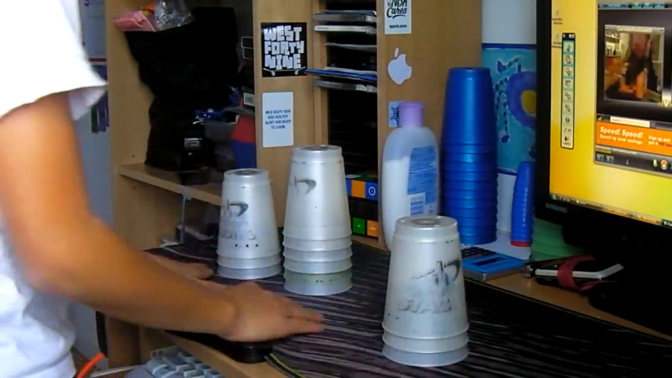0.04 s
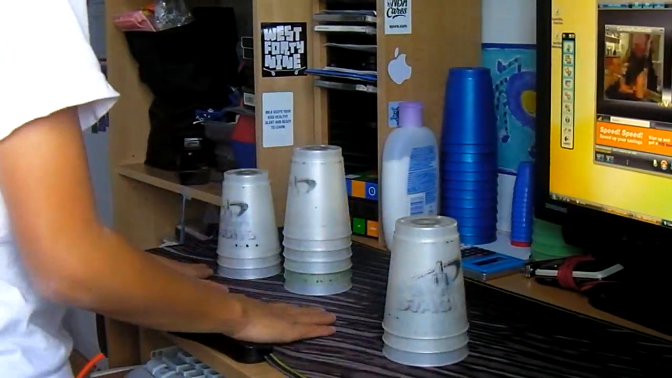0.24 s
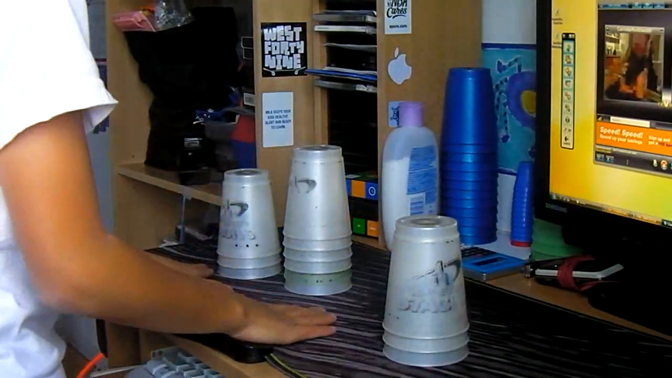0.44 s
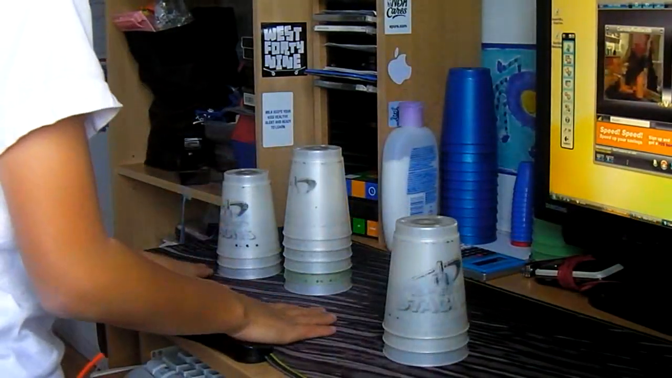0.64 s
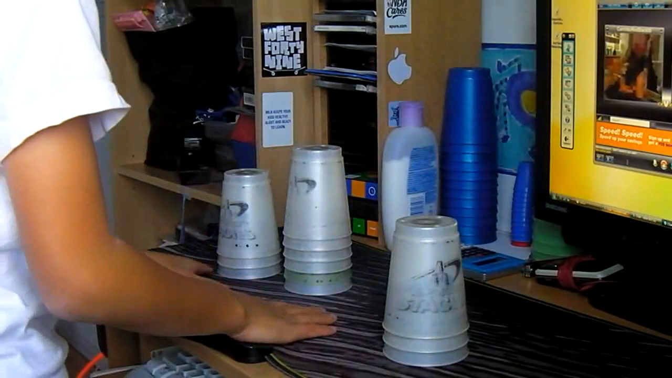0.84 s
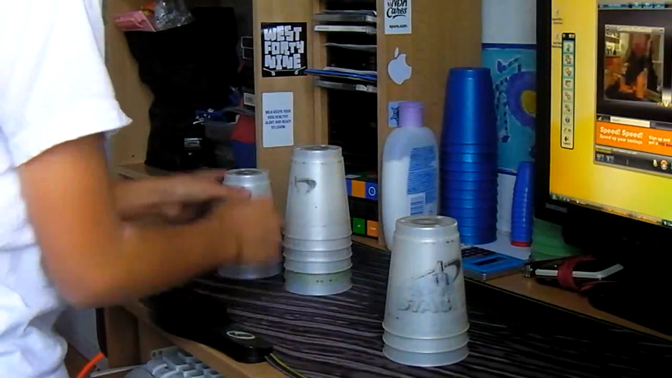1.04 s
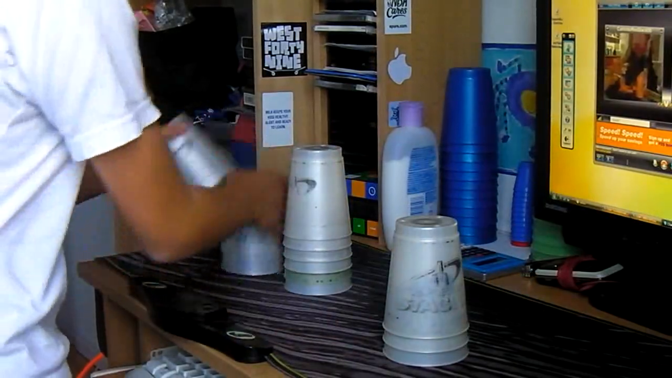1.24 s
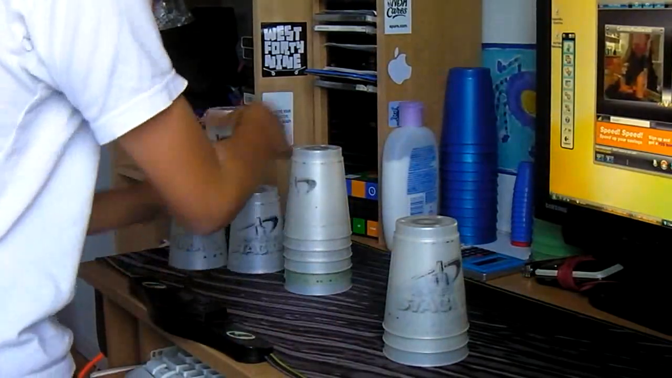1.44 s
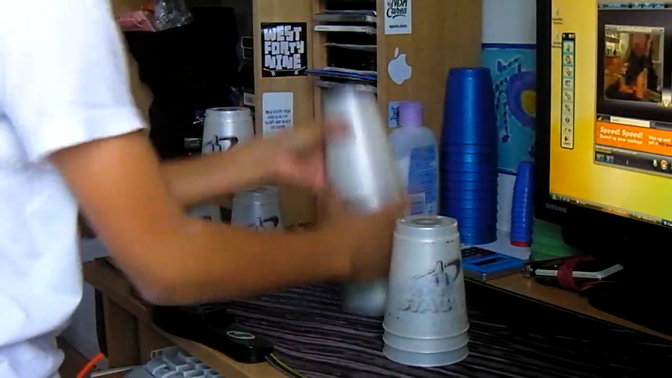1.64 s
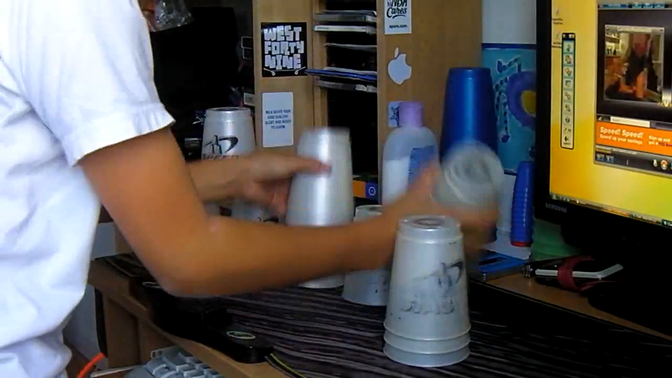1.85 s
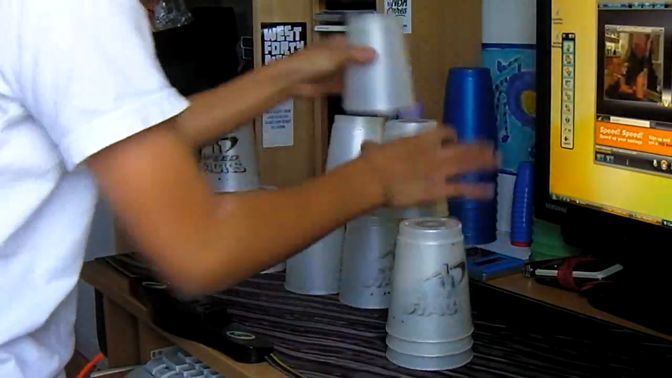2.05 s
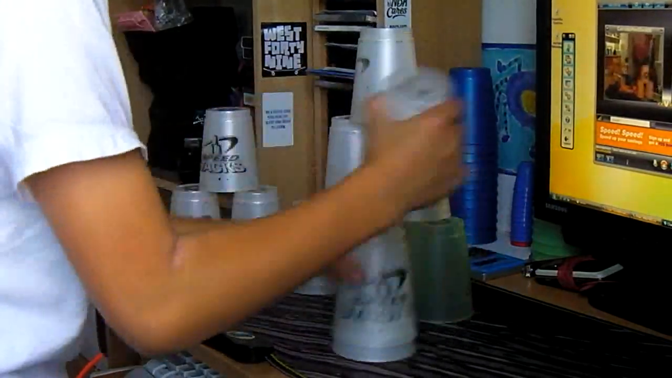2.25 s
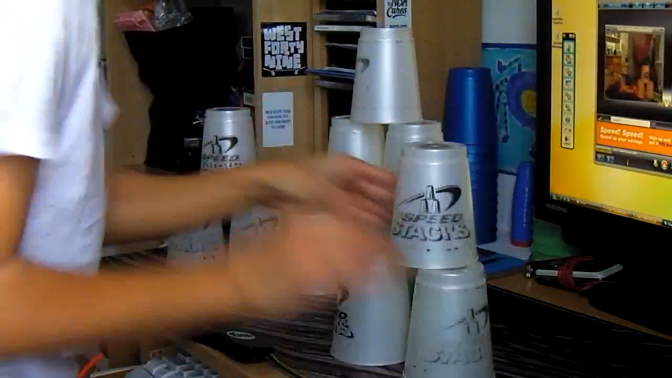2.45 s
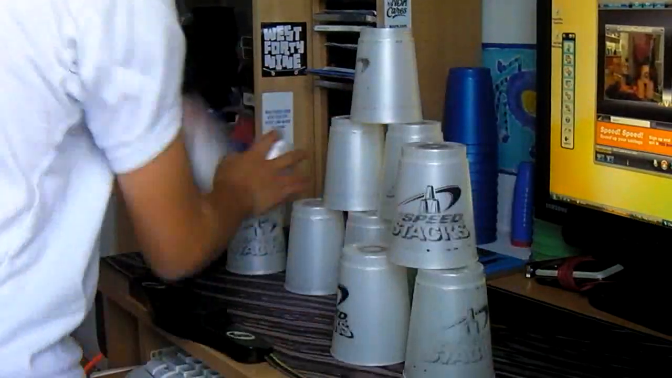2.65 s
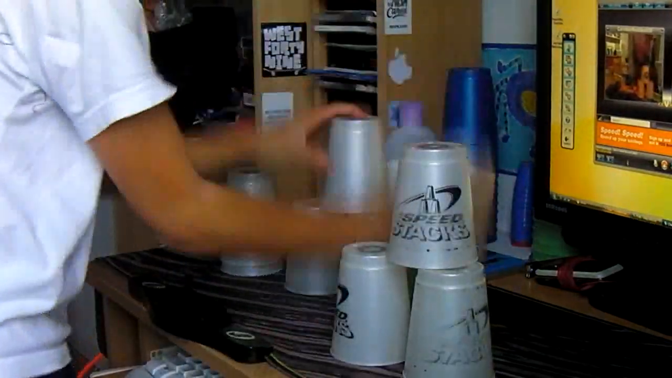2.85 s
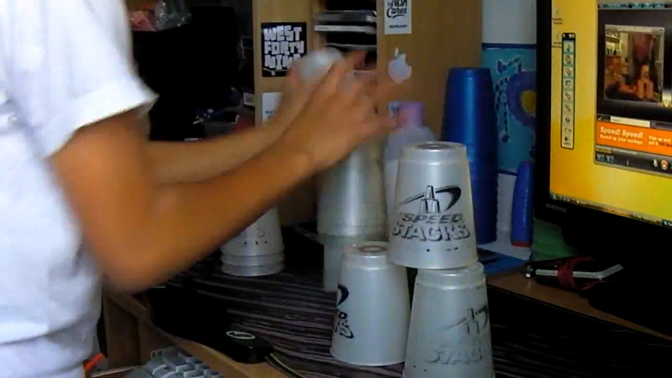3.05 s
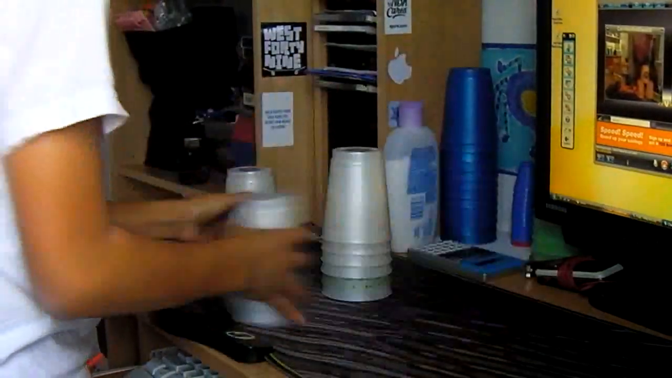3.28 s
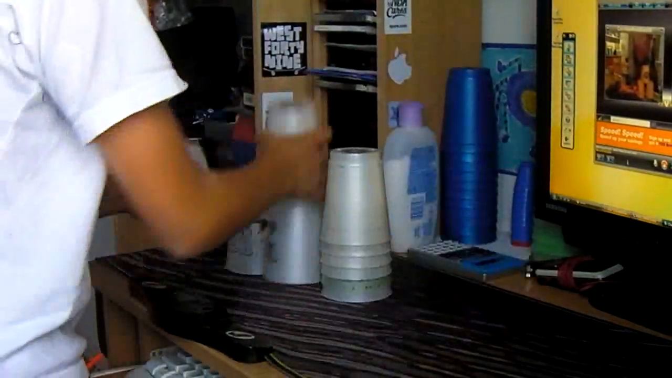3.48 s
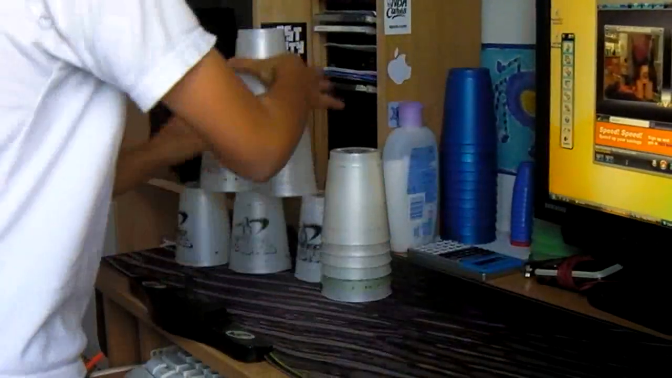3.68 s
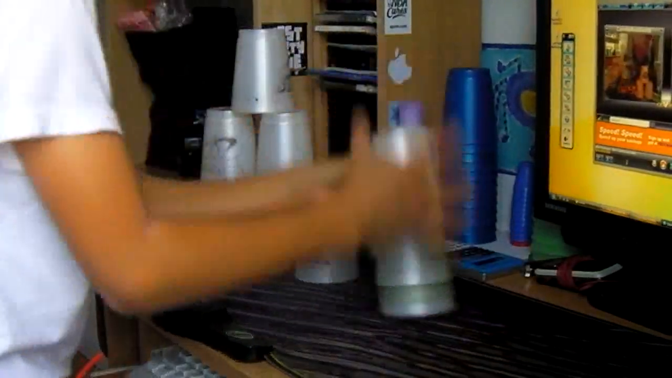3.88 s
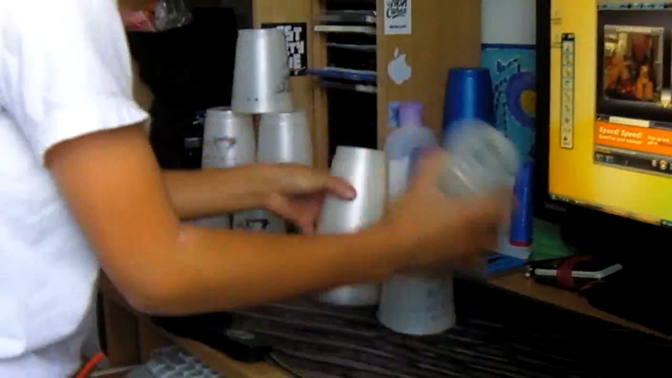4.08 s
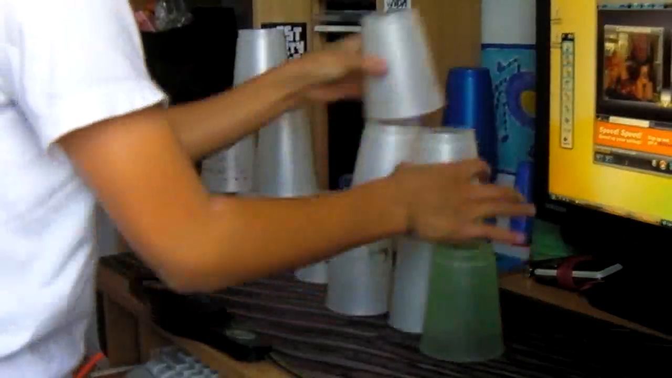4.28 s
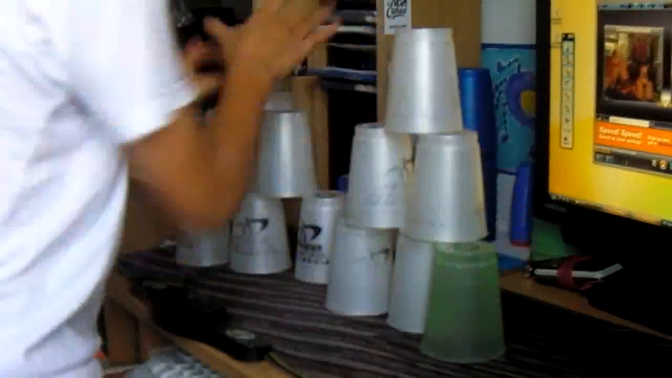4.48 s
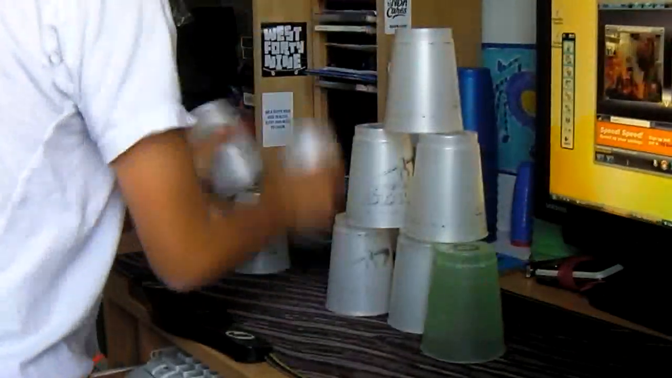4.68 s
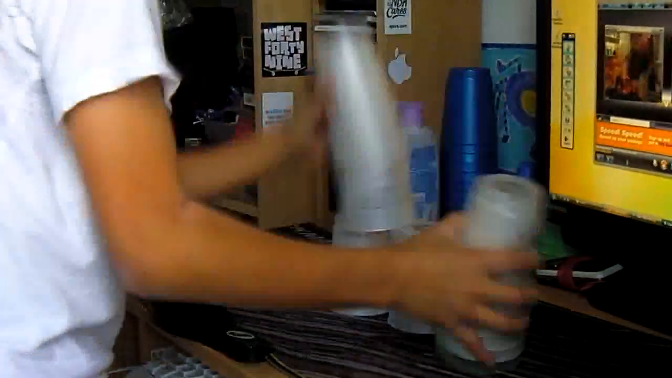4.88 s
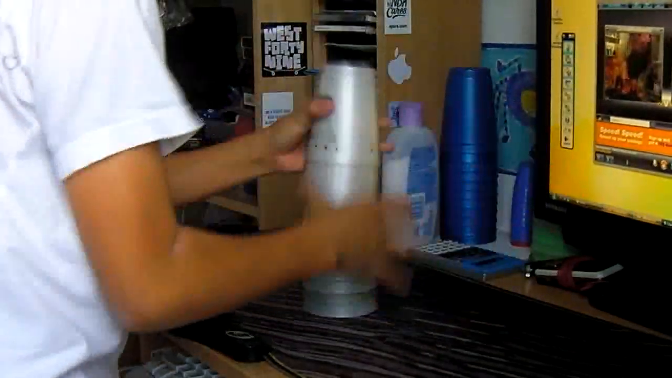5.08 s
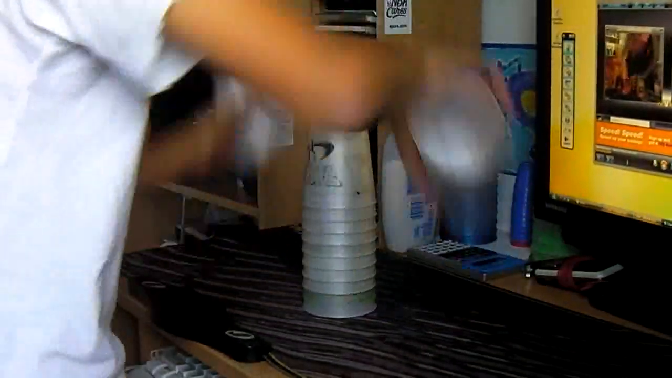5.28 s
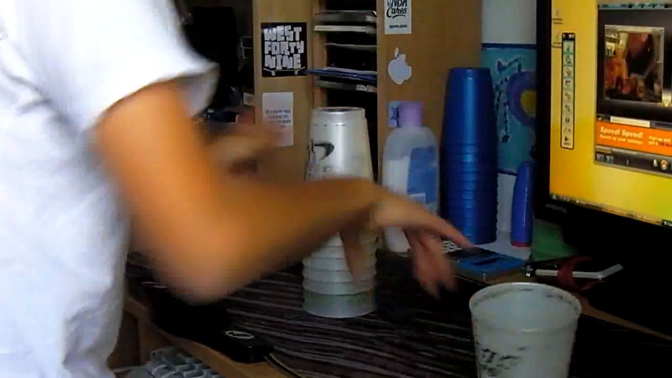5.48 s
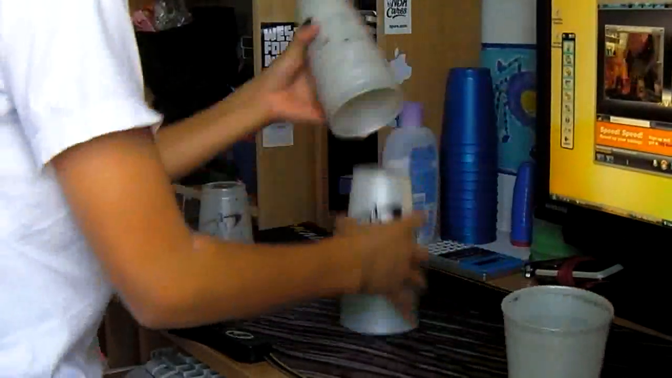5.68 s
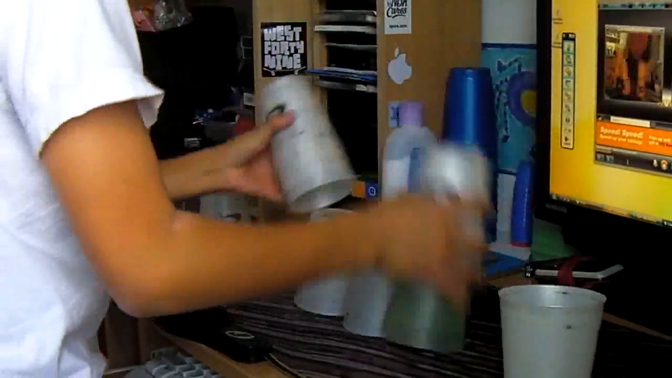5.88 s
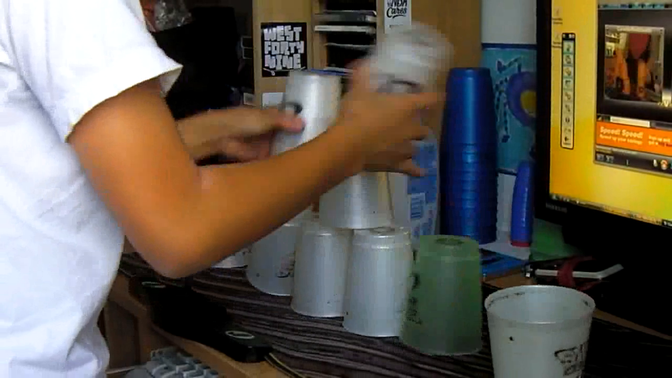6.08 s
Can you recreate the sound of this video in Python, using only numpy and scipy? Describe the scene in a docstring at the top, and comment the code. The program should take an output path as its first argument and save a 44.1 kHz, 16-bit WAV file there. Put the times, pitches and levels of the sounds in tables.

```python
"""A small room with a desk and a cloth mat: after a tap on the desk, plastic cups are stacked and unstacked at speed.
Each clack is a short chatter of rim contacts that rings the air in the cup, the cup wall and the desk top, with a crack.
Sliding cups and hands are flickering, ticking noise, coloured as a dry hiss and as a scrape through the cup body.
The air in a moving cup hums as noise through one gliding resonance.
Noise reflections make the room; two close microphone ports hear it over hiss, rumble and a faint hum that rise and sink."""
import sys
import numpy as np
from scipy import signal
from scipy.fft import rfft, irfft, next_fast_len
from scipy.io import wavfile
from scipy.ndimage import uniform_filter1d

SR = 44100
rng = np.random.default_rng(int(sys.argv[2]) if len(sys.argv) > 2 else 0)


def master(y):
    """Save y as 16-bit WAV."""
    cut = np.clip(np.atleast_2d(y).T, -1, 1)
    pcm = np.round(cut * 32767)  # scale
    wavfile.write(sys.argv[1], SR, pcm.astype(np.int16))


N = 270156  # length [samples]

# Quiet room and microphone hiss, relative spectrum: (frequency [Hz], density [dB per Hz])
AIR_COLOUR = [(18, -54), (30, -4), (88, -5.5), (103, -12), (124, -13), (145, -5.5), (189, -14), (259, -8.5),
              (486, -20), (540, -20), (988, -19), (11700, -27), (16000, -29)]
# Likeness of the hiss at the two ports: (frequency [Hz], correlation [-1 to 1, clipped])
AIR_LIKENESS = [(60, -0.69), (180, 0.057), (550, -1), (1650, -0.59), (4970, -0.46), (15000, -0.22)]
# Rise and fall of the hiss and hum together: (time [s], level change [dB])
AIR_DRIFT = [(0, 6), (1.5, 5), (1.75, 6), (2.75, 11), (3.6, -11), (4.7, -12), (5.5, 2), (6.13, -3)]
# Hum partials, before the port balance and the drift: (frequency [Hz], rms level [dB])
HUM_PARTIALS = [(118.4, -67), (231.5, -74)]
AIR_DB = -55  # rms of the hiss before the drift

# Slowly swelling and fading rubbing of cups and hands: (time [s], hiss level [dB], scrape level [dB])
SLOW_SLIDE = [(0.0, -32.5, -42), (0.43, -59, -61.5), (1.38, -60.5, -65), (1.82, -42.5, -42),
              (2.23, -39.5, -37.5), (2.73, -52.5, -42.5), (3.05, -25, -27.5), (3.27, -36, -33.5),
              (3.51, -55, -47), (4.04, -49.5, -46.5), (4.69, -47, -42.5), (5.03, -34.5, -35),
              (5.49, -61.5, -55.5), (6.12, -64, -55)]
# Single strokes, a hand brushing the mat or cups pulled out of or pushed into a stack:
# (start [s], length [s], peak hiss level [dB], peak scrape level [dB])
SLIDE_STROKES = [(0.122, 0.08, -39, -67), (0.254, .11, -50, -96), (1.07, 0.17, -57.5, -70),
                 (1.327, 0.15, -45, -45.5), (1.596, 0.13, -57, -33.5), (1.84, 0.062, -22.5, -24),
                 (2.037, 0.092, -33, -47), (2.422, 0.079, -31, -30), (2.562, 0.094, -23, -19.5),
                 (2.8, 0.22, -26.5, -29), (2.992, 0.15, -39, -31.5), (3.259, .14, -32, -27.5),
                 (3.37, 0.17, -32, -34.5), (3.654, 0.45, -50, -43.5), (4.108, 0.055, -29, -28),
                 (4.29, 0.18, -52, -39), (4.459, 0.14, -40, -27), (4.733, 0.17, -27, -22.5),
                 (4.93, .07, -33, -42), (5.017, 0.16, -26, -23), (5.126, 0.24, -36, -31),
                 (5.785, 0.11, -44.5, -43), (5.984, 0.19, -47, -44)]
# Dry hiss of the surfaces, relative spectrum: (frequency [Hz], density [dB per Hz])
HISS_COLOUR = [(1200, -24), (2500, -9.5), (4000, 0), (5500, 0), (7500, -2), (10000, -4.5), (13000, -5),
               (16000, -7.5)]
# Cup body under a slide, relative spectrum: (frequency [Hz], density [dB per Hz])
BODY_COLOUR = [(150, -61), (300, 4), (450, 13), (800, 5), (1200, -3.5), (1700, 1), (2500, -7.5),
               (4000, -49.5)]
STROKE_SKEW = 0.76  # exponent on stroke time; under 1, the loudest moment is before the middle
TICKS_PER_S, TICK_DB = 500, 7.9794  # rims catch in tiny ticks; the strongest single tick over the grain

# Air in a moving cup keeps sounding and glides as the gap under the rim changes:
# (start [s], length [s], first frequency [Hz], last frequency [Hz], rms level before the swell [dB])
CUP_HUMS = [(1.62, .14, 797, 762, -30), (2.09, 0.087, 563.4, 630, -21), (2.28, 0.12, 1143, 1100, -33),
            (2.8, 0.14, 526, 697, -28), (3.575, .085, 285, 350, -33), (3.7, 0.11, 690, 710, -40),
            (4.3, 0.13, 659, 657, -35.5), (4.725, .08, 730, 798, -27), (5.14, 0.043, 678, 686, -25),
            (5.56, 0.14, 750, 799, -41)]
HOLLOW_WIDTH_HZ = 120  # resonance width of one filter pass

# Clacks; thud, wall and crack are rms levels over the first moments:
# (time [s], cup air peak [dB], cup air frequency [Hz], wall frequency [Hz],
#  desk thud level [dB], wall level [dB], crack level [dB])
CUP_CLACKS = [(0.005, -6, 512, 1450, -17.5, -15.5, -18.5), (0.012, -25, 1090, 1500, -23.5, -18.5, -37),
              (0.02, -19, 480, 1490, -33, -24.5, -44), (0.04, -12, 388, 1340, -36, -33, -57),
              (0.393, -37.5, 385, 1900, -65, -50.5, -50), (1.075, -45, 460, 1490, -46.5, -56, -53),
              (1.308, -39.5, 568, 1820, -55, -56, -51), (1.345, -37, 520, 2220, -48, -53, -37.5),
              (1.368, -22, 446, 1680, -38, -32.5, -50), (1.396, -39, 470, 1650, -37, -45, -36.5),
              (1.563, -16.5, 660, 1640, -47, -42, -42), (1.574, -7.5, 703, 1400, -45, -34.5, -33),
              (1.591, 0.5, 822, 1780, -35, -28, -19.5), (1.618, -5.5, 720, 2090, -29, -28.5, -22.5),
              (1.757, -8, 560, 1730, -22.5, -30.5, -24), (1.85, -13, 680, 2970, -28, -25.5, -27.5),
              (1.878, -13.5, 395, 1870, -23, -19.5, -24.5), (1.977, -12, 550, 1390, -31, -50, -29),
              (2.021, -34, 1170, 1740, -49, -24, -50), (2.045, -2.5, 656, 2000, -21, -28, -17),
              (2.083, -6, 506, 2090, -38, -46, -26.5), (2.121, -9.5, 640, 2630, -23, -55, -20.5),
              (2.158, -20.5, 650, 1380, -49, -41, -27.5), (2.21, -2.5, 447, 1690, -34, -25.5, -31.5),
              (2.24, -5, 445, 1450, -29, -31, -34), (2.264, -2.5, 600, 2220, -43, -21, -20),
              (2.272, 0.5, 893, 1420, -41, -40, -20), (2.297, -13, 1110, 1300, -24.5, -45, -24.5),
              (2.361, -14, 365, 1360, -27.5, -48, -36), (2.406, -34, 651, 2420, -37, -44, -28.5),
              (2.441, -11, 573, 1604, -25, -16.5, -21), (2.542, -6.5, 687, 1620, -35, -24, -26),
              (2.551, 1, 735, 1310, -20.5, -28, -30), (2.581, -3.5, 424, 1390, -34, -15.5, -11),
              (2.619, -9.5, 555, 2120, -28, -23.5, -26), (2.79, -4, 480, 1240, -26.5, -21, -28),
              (2.839, -15, 340, 2600, -41, -19, -15), (2.904, -9, 694, 2770, -43, -28, -16.5),
              (2.99, -31, 576, 1750, -29, -24.5, -43), (3.007, -5.5, 980, 2450, -35, -22, -23.5),
              (3.029, -9.5, 590, 2600, -24, -18.5, -17.5), (3.047, -2, 510, 1820, -20, -13.5, -18),
              (3.073, -8.5, 678, 1510, -17, -13, -22), (3.122, -8, 420, 2820, -36, -24, -20),
              (3.146, -26, 1100, 1740, -49, -15, -28), (3.219, -11, 760, 2700, -48, -13.5, -15.5),
              (3.264, -10.5, 560, 1650, -28.5, -21.5, -32), (3.312, -7.5, 580, 1970, -23, -15.5, -16.5),
              (3.339, -6, 860, 1730, -30, -12, -11.5), (3.379, -18, 880, 1690, -51, -21, -24),
              (3.431, -13, 510, 1720, -29, -29, -26.5), (3.495, -18, 505, 1360, -31.5, -27, -38),
              (3.648, -14.5, 680, 1690, -35, -30, -30.5), (3.664, -13.5, 660, 1740, -41, -31.5, -34),
              (3.715, -21.5, 700, 2530, -36, -55, -28), (3.79, -14.5, 702, 1310, -33, -56, -41.5),
              (3.844, -6.5, 474, 1890, -27, -27, -26.5), (3.867, -2, 857, 1670, -41, -25.5, -19.5),
              (4.0, -25, 656, 2700, -32, -48, -38), (4.135, -11, 406, 1870, -24, -21.5, -29.5),
              (4.188, -23, 670, 1810, -50, -61, -57), (4.291, -9, 460, 2090, -27.5, -29, -42),
              (4.296, -9.5, 688, 1690, -26, -33.5, -21), (4.328, -20, 630, 2050, -48, -48, -45),
              (4.388, -19.5, 554, 2220, -30, -43, -23.5), (4.465, -12, 500, 1630, -38, -29.5, -33),
              (4.49, -10, 487, 1680, -40, -29, -31.5), (4.518, -4.5, 613, 1970, -20.5, -32.5, -23.5),
              (4.528, -1.5, 902, 1670, -30, -33, -25), (4.718, -8, 715, 1290, -34, -24.5, -24),
              (4.735, -10.5, 422, 1600, -33, -33, -33), (4.772, -13.5, 635, 3000, -38, -27.5, -30),
              (4.794, -22, 537, 2730, -36, -20, -19.5), (4.824, -4.5, 446, 1550, -35, -12, -18),
              (4.847, -7.5, 395, 1710, -44, -24, -45), (4.936, -14, 414, 2660, -33, -28, -24.5),
              (4.947, -13.5, 640, 1460, -30, -17, -22), (5.012, -5, 650, 2360, -37, -27, -19),
              (5.029, -28, 600, 2190, -44, -17, -13), (5.063, -11, 463, 2830, -20.5, -20, -20),
              (5.098, -6.5, 433, 1820, -14.5, -19, -36), (5.143, -14.5, 685, 1570, -36, -23.5, -23),
              (5.188, -9, 630, 1800, -27, -26.5, -30), (5.218, -7, 480, 1680, -16, -21, -21.5),
              (5.238, -23, 400, 1290, -32, -26, -23.5), (5.306, -18, 415, 1630, -48, -30, -29),
              (5.381, -31, 533, 1680, -62, -40, -37), (5.436, -27.5, 404, 1720, -53, -39, -45),
              (5.536, -3, 783, 1290, -37, -18, -34.5), (5.55, -4.5, 740, 1380, -29, -27, -35.5),
              (5.571, -14, 650, 1270, -34, -26.5, -45), (5.724, -10.5, 442, 1590, -30, -40.5, -35),
              (5.809, -18.5, 504, 1710, -33, -35, -38), (5.834, -22, 830, 1660, -31.5, -40, -54),
              (5.845, -18.5, 417, 1940, -30, -32, -30.5), (5.981, -17, 508, 1290, -33, -45, -66),
              (6.006, -6.5, 574, 2110, -28, -28.5, -27), (6.067, -17.5, 538, 1730, -51, -53, -54),
              (6.092, -19, 330, 1700, -34, -55, -43)]
# Cup air resonances: (factor on the cup air frequency, width of one pass [Hz], relative level [dB])
CUP_AIR_MODES = [(1.011, 222, 7.5), (0.65, 163, -1.5), (1.4, 173, -2)]
# Cup wall resonances: (factor on the wall frequency, width of one pass [Hz], relative level [dB])
WALL_MODES = [(1, 430, 0), (.78, 500, -8), (1.27, 600, -7), (1.7, 1200, -11)]
# Desk top resonances: (frequency [Hz], width of one pass [Hz], relative level [dB])
DESK_MODES = [(128, 120, -6), (188, 85, 8), (236, 30, 12), (277, 40, 4), (76, 40, -4)]
# Sharp crack of the contacts, relative spectrum: (frequency [Hz], density [dB per Hz])
CRACK_SPECTRUM = [(1470, -12), (2500, -11.5), (5110, -3.5), (7190, -7.5), (7830, -9), (9580, -7.5),
                  (16000, -15)]
CONTACTS_PER_S = 1000  # mean density of the chatter
CHATTER_T60_S, CHATTER_DB = 0.07, -1  # decay time; upper limit at its start, over the first contact
FIRST_S = .015  # the first moments, over which the rms levels count

# Reverberation time of the room: (frequency [Hz], t60 [s])
ROOM_T60 = [(150, 0.63), (400, 0.15), (1040, 0.21), (2760, 0.23), (7280, 0.26), (15000, 0.05)]
# Reverberant energy over direct, before the build-up ramp: (frequency [Hz], level [dB])
ROOM_LEVEL = [(100, -13.5), (500, -2.44), (2000, -3.5), (6000, -5.1), (15000, -3)]
LOW_CUT_HZ = 125  # small bodies radiate little bass

# Likeness of the cups at the two ports: (frequency [Hz], correlation [0 to 1])
PORT_LIKENESS = [(60, .95), (500, .98), (900, .9), (1600, .9), (2300, .66), (3400, .6), (4200, .27),
                 (6000, .15), (9000, .32), (16000, .25)]
# Phase by which the left port leads, negative where it lags: (frequency [Hz], phase [rad])
PORT_LEAD = [(50, -2.0), (110, -1.65), (240, -1.1), (500, -.62), (900, -.42), (2200, -.15), (3400, -.15),
             (4500, -1.1), (6500, -2.9), (16000, -3.1)]
# Port balance, left minus right: (frequency [Hz], level difference [dB])
PORT_TILT = [(60, 18), (150, 0.5), (380, -1.5), (950, -3), (2380, -1.5), (5980, -0.5), (15000, 0)]
NOTCH_HZ, NOTCH_HALF_WIDTH_HZ, NOTCH_DB = 7900, 65, -16
EDGE_HZ = 16150  # band limit


def gain_of(db):
    """Decibels to amplitude."""
    return 10 ** (np.asarray(db) / 20)


def evened(x):
    """Scales x to rms 1."""
    return x / np.sqrt(np.mean(x ** 2) + 1e-20)


def first_evened(x):
    """Scales x so that its first moments have rms 1."""
    return x / np.sqrt(np.mean(x[:round(FIRST_S * SR)] ** 2) + 1e-20)


def read(points, hz):
    """Reads a (frequency, value) table on a log-frequency axis."""
    f, value = np.transpose(points)
    return np.interp(np.log(hz + 1), np.log(f + 1), value)


def add(mix, s, sound):
    """Mixes a sound in at second s."""
    part = mix[round(s * SR):][:len(sound)]
    part += sound[:len(part)]


def coloured(x, points):
    """Filters x by the gains of a (frequency, dB) table."""
    length = x.shape[-1]
    size = next_fast_len(length)
    gain = gain_of(read(points, np.fft.rfftfreq(size, 1 / SR)))
    return irfft(rfft(x, size) * gain, size)[..., :length]


def ring(x, modes, scale=1):
    """Sum of damped resonances driven by x, each passed twice so that it swells in and has steep flanks; peak 1."""
    out = 0
    for hz, width, db in modes:
        pole = np.exp((2j * np.pi * hz * scale - np.pi * width) / SR)
        twice = signal.lfilter([(1 - abs(pole)) ** 2], [1, -2 * pole, pole ** 2], x)
        out = out + gain_of(db) * twice.real
    return out / abs(out).max()


def ports(a, b, alike, lead, tilt_db):
    """The right port hears a share of what the left one hears plus another path, all turned in phase."""
    alike = np.clip(alike, -1, 1)
    left = rfft(a)
    right = alike * left + np.sqrt(1 - alike ** 2) * rfft(b)
    right = right * np.exp(-1j * lead)
    return irfft([left * gain_of(tilt_db / 2), right / gain_of(tilt_db / 2)], N)


def air(hz):
    """Hiss and rumble are coloured noise, the hum is sines of slightly wavering pitch; all rise and sink."""
    t = np.arange(N) / SR
    a, b = coloured(rng.standard_normal((2, N)), AIR_COLOUR)
    hiss = gain_of(AIR_DB) * evened(ports(a, b, read(AIR_LIKENESS, hz), 0, 0))
    pitch = 1 + 0.0223 * evened(uniform_filter1d(rng.standard_normal(N), 8000))
    wavering_t = np.cumsum(pitch) / SR
    hum = sum(np.sqrt(2) * gain_of(db) * np.sin(2 * np.pi * f * wavering_t) for f, db in HUM_PARTIALS)
    hum_balance = [[1.6], [.4]]  # left, right
    drift = gain_of(np.interp(t, *np.transpose(AIR_DRIFT)))
    return (hiss + hum * hum_balance) * drift


def room(x):
    """Two paths for each spot on the desk: the direct sound plus sparse reflections that die band by band."""
    taps = np.zeros((2 * len(x), SR // 2))
    # one reflection of random sign in every 10 samples
    at = np.arange(200, SR // 2 - 10, 10) + rng.integers(0, 10, (len(taps), (SR // 2 - 201) // 10))
    np.put_along_axis(taps, at, rng.choice([-1., 1.], at.shape), 1)
    hz, t, bands = signal.stft(taps, SR, nperseg=512)
    bands = bands * gain_of(-60 * t / read(ROOM_T60, hz)[:, None])
    band_size = np.sqrt((abs(bands) ** 2).sum(2).mean(0))[:, None]
    tail = signal.istft(bands / band_size, SR, nperseg=512)[1]
    tail = coloured(tail / np.linalg.norm(tail[0]), ROOM_LEVEL)
    # reflections build up after the direct sound
    tail *= np.clip((np.arange(tail.shape[1]) / SR - .003) / 0.0055, 0, 1)
    tail = tail.reshape(2, len(x), -1)
    tail[0, :, 0] = 1
    # the second path scatters round the housing
    tail[1, :, 1:41] = rng.standard_normal((len(x), 40)) / np.sqrt(40)
    return signal.fftconvolve(x[None], tail, axes=2).sum(1)[:, :N]


def pressure():
    """How hard the surfaces rub, for hiss and scrape: a slow part plus one swell for each stroke."""
    t = np.arange(N) / SR
    s, *dbs = np.transpose(SLOW_SLIDE)
    level = gain_of([np.interp(t, s, db) for db in dbs])
    for start, length, *dbs in SLIDE_STROKES:
        swell = np.sin(np.pi * np.linspace(0, 1, round(length * SR)) ** STROKE_SKEW)
        for row, db in zip(level, dbs):
            add(row, start, gain_of(db) * swell)
    return level


def slide(level):
    """Dry friction: noise that flickers with the grain of the surfaces, as a hiss and through the cup body."""
    flicker_db = 2.5 * evened(uniform_filter1d(rng.standard_normal(N), 200))
    grain = rng.standard_normal(N) * gain_of(flicker_db)
    catches = rng.random(N) * (rng.random(N) < TICKS_PER_S / SR)
    grain *= 1 + gain_of(TICK_DB) * np.convolve(catches, np.hanning(30), "same")
    hiss = evened(coloured(grain, HISS_COLOUR))
    scrape = evened(coloured(grain, BODY_COLOUR))
    return level[0] * hiss + level[1] * scrape


def hollow(start, length, from_hz, to_hz, db):
    """Turbulence excites one gliding air resonance, swelling in and out."""
    u = np.linspace(0, 1, round(length * SR))
    r = np.exp(-np.pi * HOLLOW_WIDTH_HZ / SR)
    # narrow noise around 0 Hz, then shifted up to the gliding pitch
    wobble = signal.lfilter([1], [1, -2 * r, r * r], rng.standard_normal((2, SR // 4)))[:, -len(u):]
    phase = 2 * np.pi * np.cumsum(from_hz + (to_hz - from_hz) * u) / SR
    tone = (wobble[0] + 1j * wobble[1]) * np.exp(1j * phase)
    swell = np.sin(np.pi * u ** STROKE_SKEW)
    return start, gain_of(db) * swell * evened(tone.real)


def clack(row, chance):
    """A first contact and a chatter of further ones ring the cup air, the wall and the desk, each with a crack."""
    s, peak_db, air_hz, wall_hz, thud_db, wall_db, crack_db = row
    t = np.arange(chance.shape[1]) / SR
    dying = gain_of(CHATTER_DB - 60 * t / CHATTER_T60_S)
    contacts = (chance[0] < CONTACTS_PER_S / SR) * (2 * chance[1] - 1) * dying
    contacts[0] = 1
    burst = t[:400] / .0007 * np.exp(1 - t[:400] / .0007)  # each contact's noise peaks after 0.7 ms
    grit = np.convolve(abs(contacts), burst)[:len(t)] + .15 * dying
    wall_drive = contacts + 0.31 * grit * (2 * chance[3] - 1)
    cup_air = gain_of(peak_db) * ring(contacts, CUP_AIR_MODES, air_hz)
    thud = gain_of(thud_db) * first_evened(ring(contacts, DESK_MODES))
    wall = gain_of(wall_db) * first_evened(ring(wall_drive, WALL_MODES, wall_hz))
    crack = gain_of(crack_db) * first_evened(coloured(grit * (2 * chance[2] - 1), CRACK_SPECTRUM))
    fade_out = np.minimum((t[-1] - t) / .01, 1)
    return s, (cup_air + thud + wall + crack) * fade_out


def scene():
    """Slides, hums and clacks come from four spots on the desk; room and ports carry them over the quiet air."""
    hz, level = np.fft.rfftfreq(N, 1 / SR), pressure()
    spots = np.array([slide(level) / 2 for _ in range(4)])  # four independent halves sum to full power
    chances = rng.random((len(CUP_CLACKS), 4, 4500))
    for k, (row, chance) in enumerate(zip(CUP_CLACKS, chances)):
        add(spots[k % len(spots)], *clack(row, chance))
    for k, row in enumerate(CUP_HUMS):
        add(spots[k % len(spots)], *hollow(*row))
    low_cut = signal.butter(3, LOW_CUT_HZ, "high", fs=SR, output="sos")
    cups = signal.sosfilt(low_cut, room(spots))
    heard = ports(*cups, read(PORT_LIKENESS, hz), read(PORT_LEAD, hz), read(PORT_TILT, hz))
    return heard + air(hz)


def record(dry):
    """The housing cuts a narrow notch in the treble; peaks beyond full scale clip; then the band limit."""
    hz = np.fft.rfftfreq(N, 1 / SR)
    notch_db = NOTCH_DB / (1 + ((hz - NOTCH_HZ) / NOTCH_HALF_WIDTH_HZ) ** 2)
    notched = irfft(rfft(dry) * gain_of(notch_db), N)
    band_limit = signal.firwin(511, EDGE_HZ, window=("kaiser", 9), fs=SR)
    return signal.oaconvolve(np.clip(notched, -1, 1), band_limit[None], "same")


dry = scene()
out = record(dry)
master(out)
```